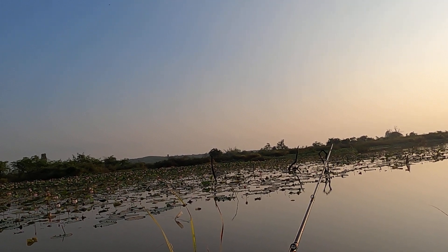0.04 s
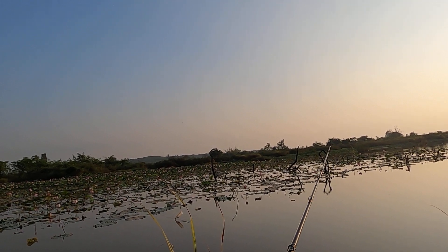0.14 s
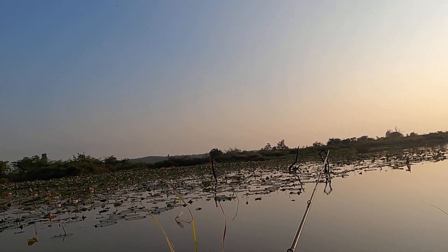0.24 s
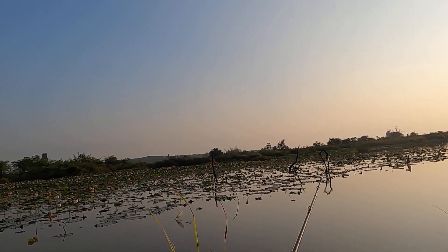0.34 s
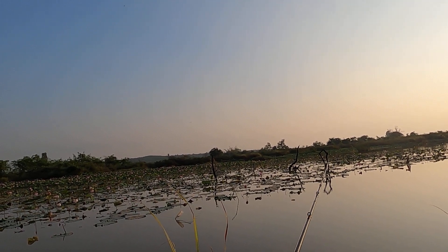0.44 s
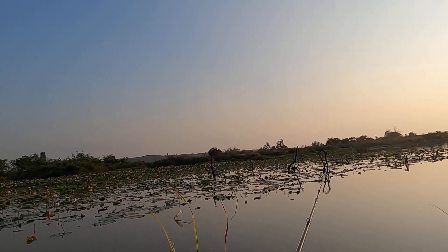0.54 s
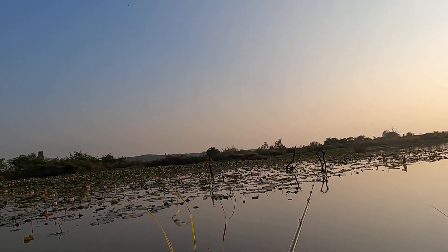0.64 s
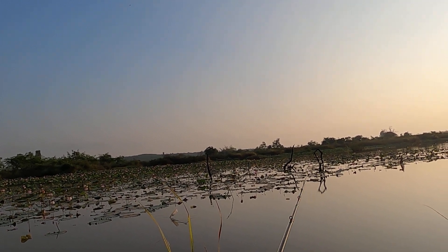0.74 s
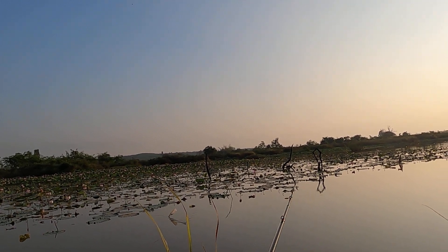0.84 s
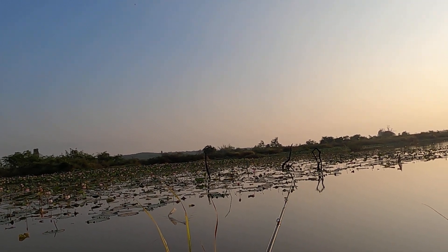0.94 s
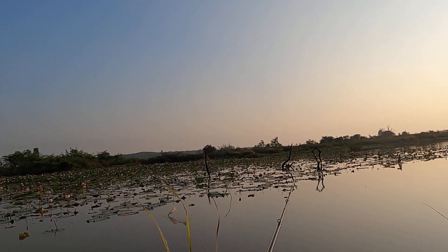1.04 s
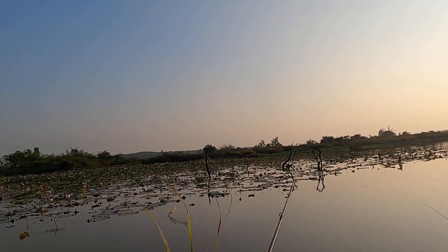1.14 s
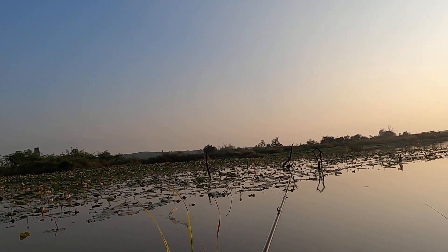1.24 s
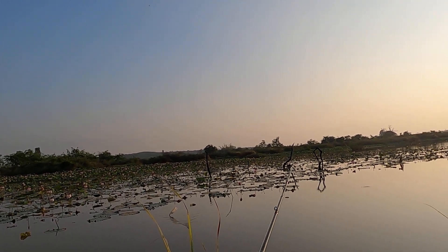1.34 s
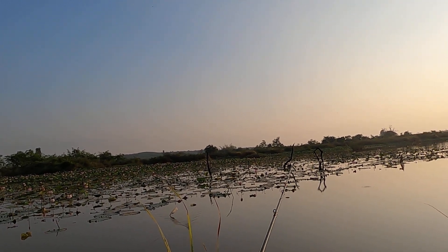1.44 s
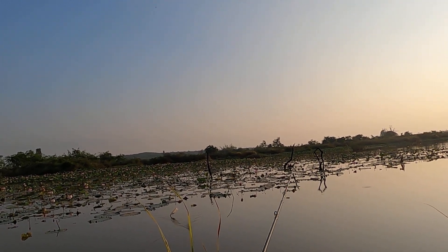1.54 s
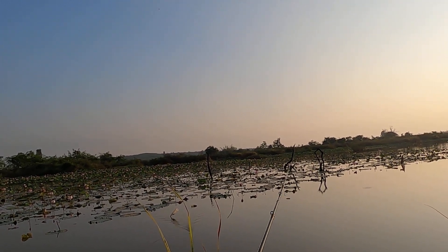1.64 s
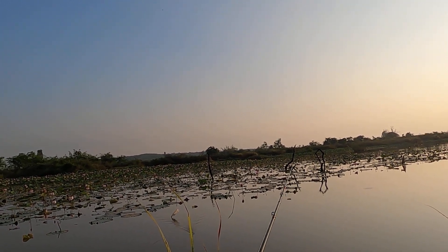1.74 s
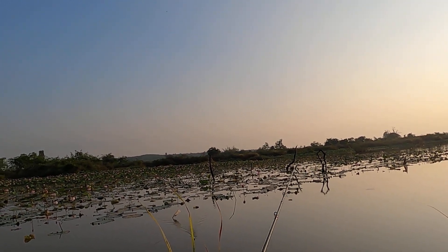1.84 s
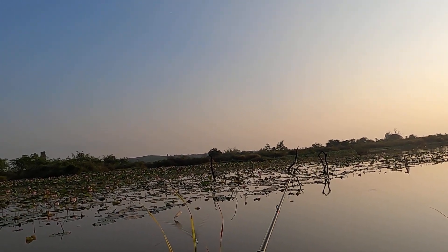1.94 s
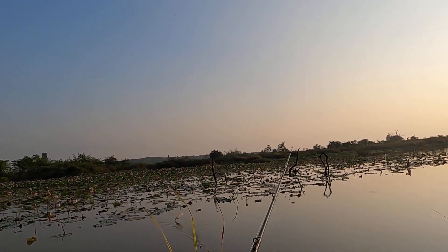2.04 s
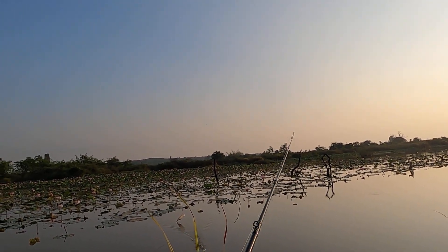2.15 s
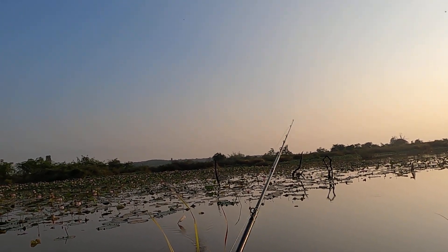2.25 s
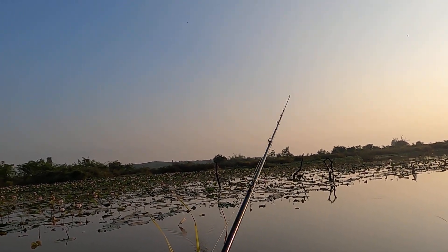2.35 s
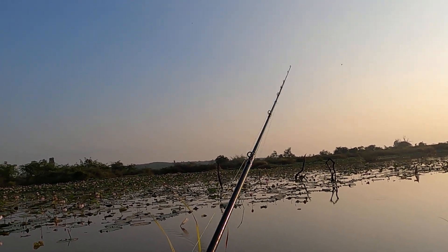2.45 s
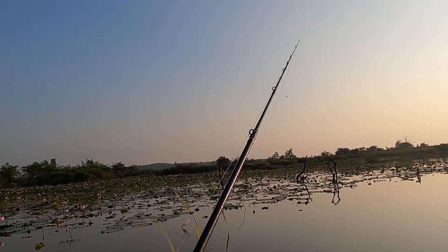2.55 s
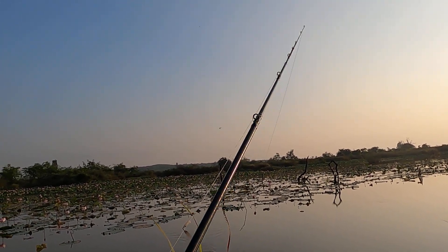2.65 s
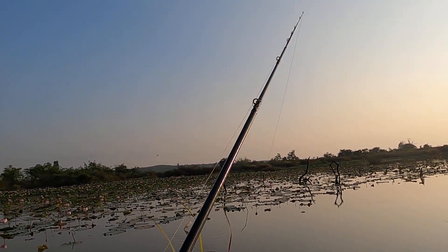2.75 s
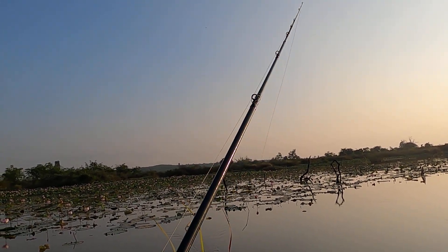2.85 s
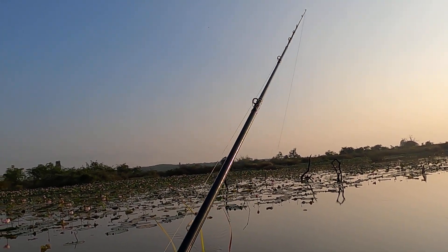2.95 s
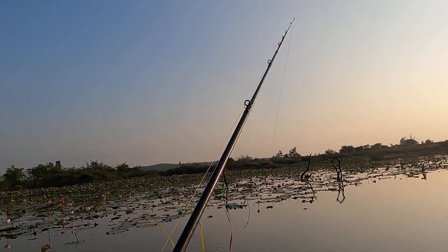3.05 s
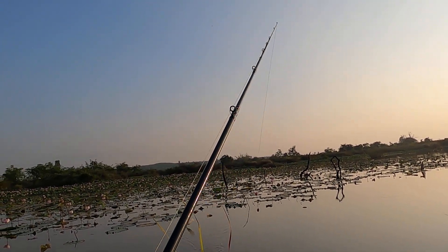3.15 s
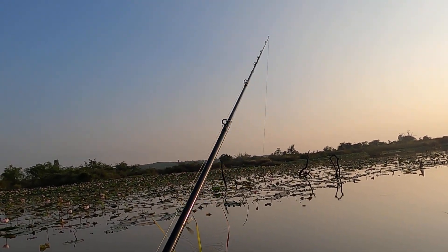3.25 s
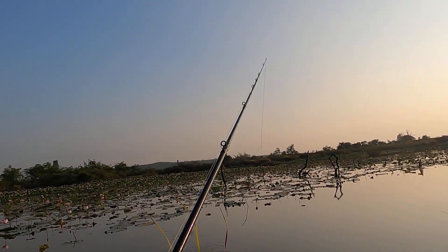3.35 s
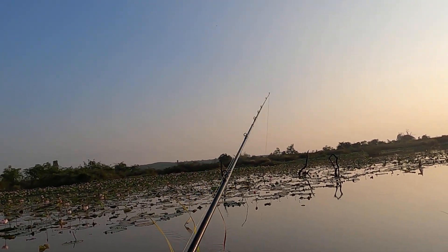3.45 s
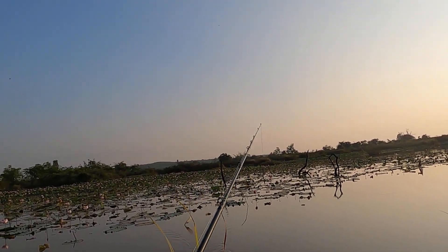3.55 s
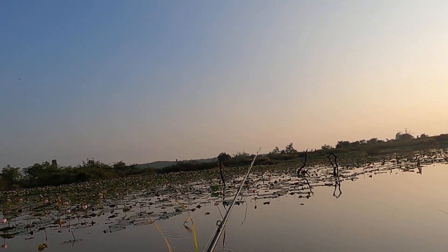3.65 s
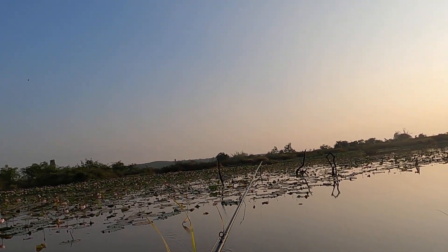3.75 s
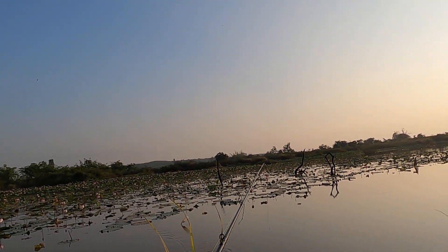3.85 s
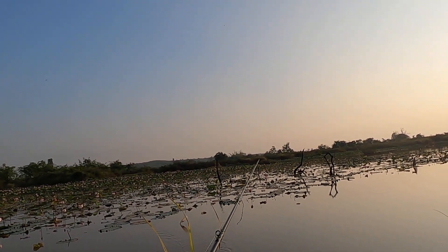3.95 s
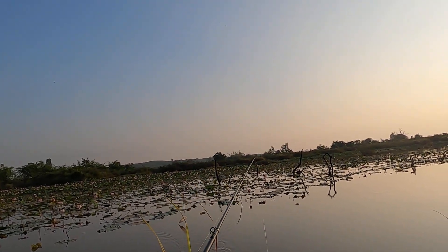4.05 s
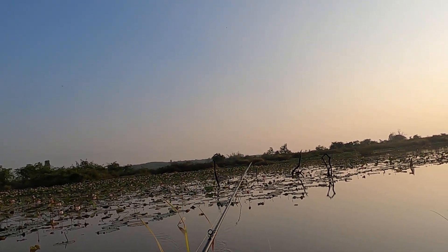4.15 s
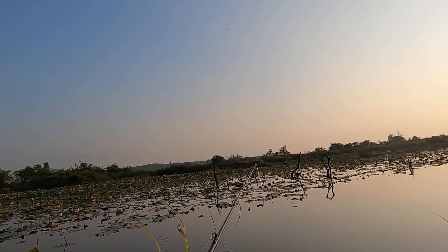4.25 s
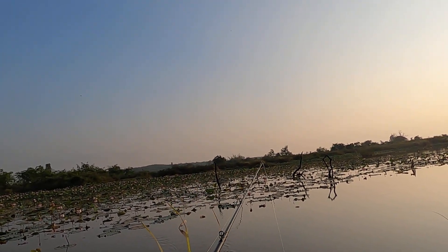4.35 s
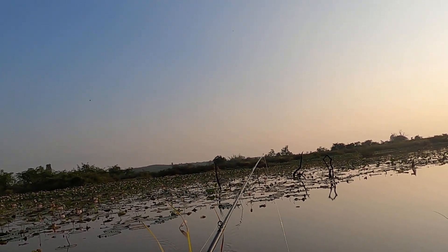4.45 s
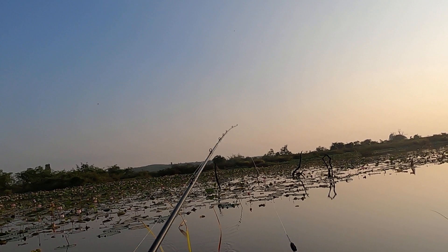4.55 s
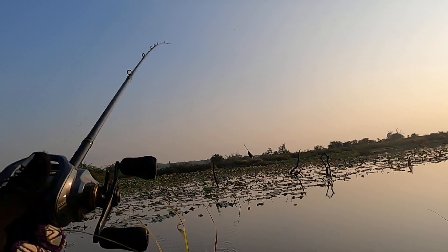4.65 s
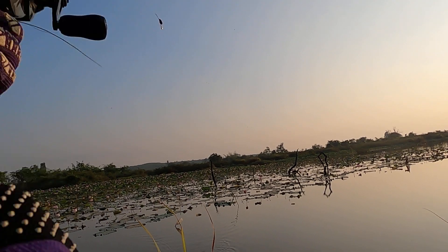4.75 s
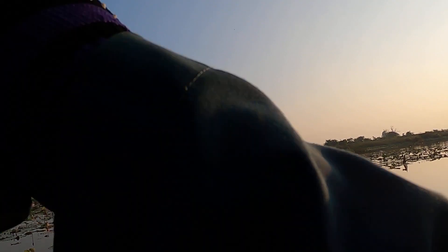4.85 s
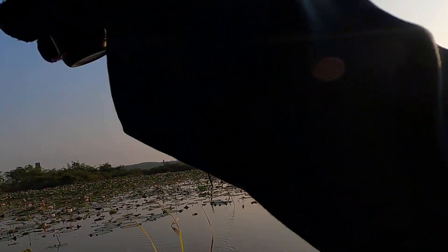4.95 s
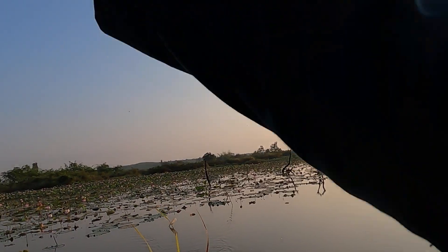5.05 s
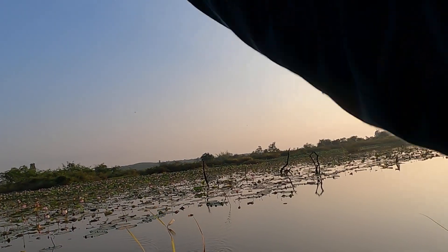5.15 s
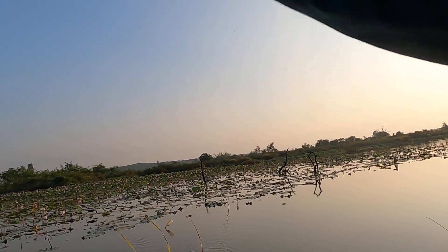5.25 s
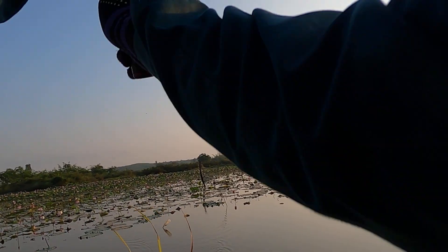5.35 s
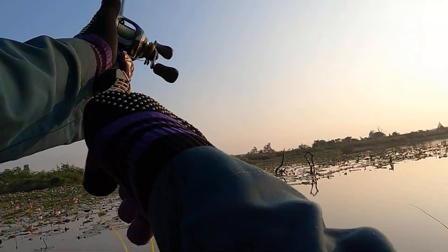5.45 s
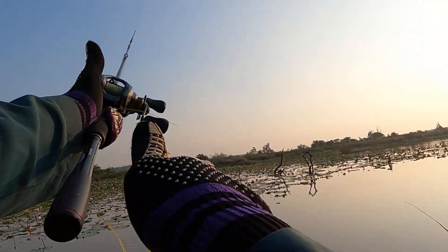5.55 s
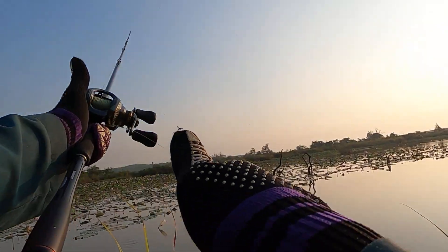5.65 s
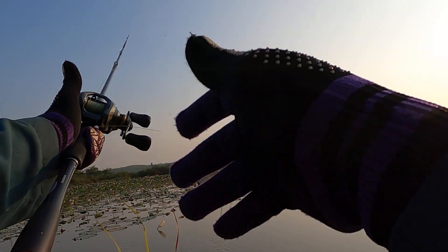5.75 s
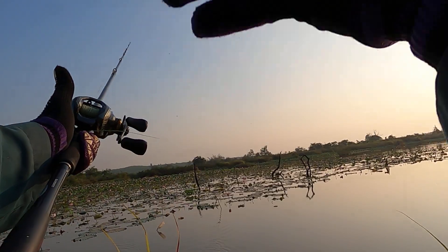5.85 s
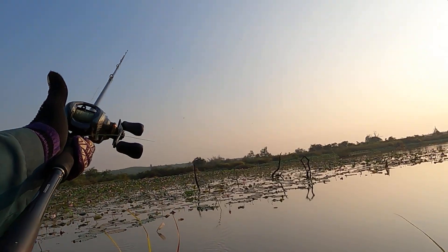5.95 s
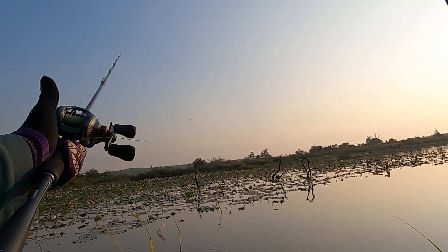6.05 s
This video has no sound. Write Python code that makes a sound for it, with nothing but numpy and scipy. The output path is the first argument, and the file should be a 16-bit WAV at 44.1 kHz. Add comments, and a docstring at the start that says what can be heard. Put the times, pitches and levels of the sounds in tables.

```python
"""On a still lily lake an angler winds in line, presses the clutch of his reel, swings the rod and casts.
Reel sounds are noise grains and short blows ringing resonances; the swing is gusting shaped noise.
The spool whirs as a gliding sine while its electronic brake sings in sums and differences of two tones.
Katydids trill and a cricket buzzes as pulsed sines, and a small bird repeats a phrase of swept sines.
Everything is heard at two ports a finger apart, through small delays and level differences."""
import sys
import numpy as np
from scipy import signal
from scipy.fft import rfft, irfft, next_fast_len
from scipy.io import wavfile
from scipy.ndimage import uniform_filter1d, map_coordinates

SR = 44100
rng = np.random.default_rng(int(sys.argv[2]) if len(sys.argv) > 2 else 0)


def wav_record(signal):
    """Record a signal, one row per channel, as 16-bit PCM in the file named by sys.argv[1]."""
    frames = np.transpose(np.atleast_2d(signal))
    bounded = np.clip(frames, -1, 1)
    # unit amplitude maps onto the largest positive 16-bit level
    quanta = np.round(bounded * 32767).astype(np.int16)
    wavfile.write(sys.argv[1], SR, quanta)


N = 268807
T = np.arange(N) / SR  # time in s

# Likeness of the two ports in broad noise. Each row: frequency in Hz, left-right correlation (0 to 1).
PORT_LIKENESS = [(60, 0.99), (600, 0.38), (1500, 0.54), (3000, 0.12), (6000, 0.44), (15000, 0.38)]


def amp(db):
    """Decibels are twenty times the decimal logarithm of an amplitude ratio."""
    return 10 ** (np.asarray(db) / 20)


def unit(x):
    """Normalization to unit root-mean-square amplitude."""
    return x / np.sqrt(np.mean(x ** 2) + 1e-20)


def along(points, hz):
    """Linear interpolation of (Hz, value) points on a logarithmic frequency axis."""
    f, v = np.transpose(points)
    return np.interp(np.log(hz + 1), np.log(f + 1), v)


def curves(rows):
    """Envelopes by interpolation in time: -120 before the first row, the last value held after it."""
    s, *cols = np.transpose(rows)
    return [np.interp(T, s, c, left=-120, right=c[-1]) for c in cols]


def wobble(rate):
    """Band-limited random modulation: a smooth curve through Gaussian knots, rate knots a second."""
    return map_coordinates(rng.standard_normal(int(N * rate / SR) + 4), [T * rate])


def filtered(x, response):
    """Linear filtering: the spectrum times a complex response of frequency."""
    m = next_fast_len(N + 8192)
    return irfft(rfft(x, m) * response(np.fft.rfftfreq(m, 1 / SR)), m)[..., :N]


def body(modes):
    """Modal response: a sum of damped resonances (centre Hz, width Hz, dB) of alternating sign."""
    def response(f):
        return sum((-1) ** k * amp(db) * 1j * f * w / (c * c - f * f + 1j * f * w)
                   for k, (c, w, db) in enumerate(modes))
    return response


def place(x, lead_us, pan_db):
    """Interaural-style cues: positive lead and pan make the left port earlier and louder."""
    side = np.array([[.5], [-.5]])
    return filtered(x, lambda f: amp(side * pan_db) * np.exp(2j * np.pi * f * side * lead_us * 1e-6))


def rush(spectrum, alike, lead_us=50, patchy_db=2.0):
    """Diffuse turbulence: unit-rms stereo noise with random gain patches and set coherence by frequency."""
    z = signal.stft(rng.standard_normal((2, N)), nperseg=256)[2]
    field = uniform_filter1d(rng.standard_normal(z.shape[1:]), 4, 0)
    field = uniform_filter1d(field, 5, 1)
    pair = signal.istft(z * amp(patchy_db * unit(field)), nperseg=256)[1][:, :N]

    def mix(hz):
        # cos(2 * turn) is the correlation of mid + side with mid - side
        turn = np.arccos(np.clip(along(alike, hz), -1, 1)) / 2
        return amp(along(spectrum, hz)) * [np.cos(turn), np.sin(turn)]
    mid, side = filtered(pair, mix)
    return unit(place(np.array([mid + side, mid - side]), lead_us, -1.1))


def add(track, s, piece):
    """Superposition: mix a piece into the track at s seconds."""
    i = round(s * SR)
    piece = piece[..., max(-i, 0):N - i]
    track[..., max(i, 0):max(i, 0) + piece.shape[-1]] += piece


def winding():
    """Friction excitation: uneven gear grains ring the reel's frame; the wet line hums and spits."""
    # Effort on the handle. Each row: time in s, mean gear level in dB.
    effort = [(0, -65.5), (.55, -65.5), (.78, -54), (.9, -61.5), (1.17, -54.5), (1.28, -58.5), (1.6, -52.5),
              (2.2, -48), (2.9, -47), (3.55, -49), (4.0, -52), (4.15, -66), (4.34, -62), (4.42, -47),
              (4.53, -60), (4.6, -49), (4.76, -74), (5.1, -55)]
    # Frame resonances. Each row: centre in Hz, width in Hz, level in dB.
    gear_modes = [(1397, 240, -14.5), (1686, 88, 0), (1919, 65, -5), (2056, 101, -3), (3030, 610, -15)]
    # Handle knob. Each row: time in s, mean level over the gear in dB.
    knob_over_gear = [(0, -4.5), (1.0, -4.5), (2.2, -4), (2.7, -5), (2.9, -11.5), (3.6, -5.5), (4.0, -6.5),
                      (4.2, -10), (5.1, -37)]
    # Hum of the line. Each row: time in s, level in dB.
    line_hum = [(0, -72), (.55, -65.5), (.9, -61), (1.15, -61.5), (1.8, -63.5), (2.15, -53.5),
                (2.55, -54.5), (2.89, -62), (2.98, -44.5), (3.45, -57.5), (4.0, -71), (4.2, -83),
                (4.45, -58.5), (4.75, -75), (4.86, -54.5), (5.1, -57)]
    stroke_s, first_stroke_s = .2, .375  # each push of the handle, two a turn
    gear_surge_db, knob_surge_db = 1, 2  # swell at each push
    catch_s, catch_half_s, catch_db = 2.438, 0.027, 11  # the handle catches for a moment
    grain_top_hz = 7000  # the rubbing teeth are too blunt to excite more

    stop = [(5.15, -120)]
    effort_db, = curves(effort + stop)
    over_db, = curves(knob_over_gear + stop)
    hum_db, = curves(line_hum + stop)
    push = np.cos(2 * np.pi * (T - first_stroke_s) / stroke_s)
    dip_db = catch_db * np.clip(1 - np.abs(T - catch_s) / catch_half_s, 0, 1)
    gear_db = effort_db + gear_surge_db * push - dip_db
    knob_db = effort_db + over_db + knob_surge_db * push - dip_db

    grains = rng.standard_normal((2, N)) * amp(2.3 * wobble(200) + 1.2 * wobble(50))
    rubbing = grains[0] + 0.25 * grains  # mostly common to both ports
    grip = np.clip(.5 + 1.0 * wobble(6), 0, 1)

    def ring(modes):
        """Drifting resonance: the grip crossfades two slightly detuned sets of modes."""
        def tuned(shift):
            return filtered(rubbing, lambda f: body(modes)(f * shift) / (1 + 1j * f / grain_top_hz) ** 2)
        return unit(grip * tuned(.96) + (1 - grip) * tuned(1.04))

    gear = amp(gear_db) * ring(gear_modes)
    knob = amp(knob_db) * ring([(863, 147, 0)])
    line = rng.standard_normal((3, N)) * amp(2.6 * wobble(24.58))
    hum = unit(filtered(line[0] + 0.41 * line[1:], lambda f: body([(360, 220, 0)])(f) ** 2))
    spray_spectrum = [(3000, -35), (4000, -2), (5500, -3), (7000, -7), (9000, -46)]  # (Hz, dB)
    spray = amp(1.5 * wobble(60)) * rush(spray_spectrum, PORT_LIKENESS, patchy_db=4.5)
    return place(gear + knob, 61, -4) + amp(hum_db - dip_db) * hum + amp(0.52 * gear_db - 39) * spray


def air():
    """Structure-borne rumble and bumps through the mount, over the broadband still air of the lake."""
    # Relative rumble spectrum. Each row: frequency in Hz, spectral level in dB.
    rumble_spectrum = [(11, -62), (18, -9), (48, 7), (118, -5.5), (152, 0), (216, -6.5), (300, -13),
                       (390, -43.5), (660, -120)]
    # Relative spectrum of the still air. Each row: frequency in Hz, spectral level in dB.
    air_spectrum = [(59, -24), (100, 1), (219, 1), (413, -16), (731, -17), (1020, -10), (1160, -13.5),
                    (1630, -9.5), (2710, -18.5), (3150, -15), (4140, -28), (6880, -25), (8870, -9.5),
                    (11900, -33), (15700, -37)]
    # Knocks against the mount. Each row: peak time in s, mean level in dB.
    mount_bumps = [(.06, -65), (.39, -62), (.75, -47.5), (1.18, -54), (2.24, -63), (3.13, -65), (3.38, -58),
                   (3.5, -64), (3.65, -60), (3.86, -62), (4.85, -41)]
    rumble_db, rise_s, fall_s = -58.5, 0.042, 0.05  # mean steady rumble; time constants of a bump

    bumps = 0
    for s, db in mount_bumps:
        bumps = bumps + amp(db) * np.exp(-np.where(T < s, (s - T) / rise_s, (T - s) / fall_s))
    fade = np.clip((5.2 - T) / 0.26, 0, 1)  # the steady part is gone at 5.2 s
    steady = amp(rumble_db + 2.4 * wobble(5.45)) * fade
    rumble = (steady + bumps) * amp(3.2 * wobble(22)) * rush(rumble_spectrum, [(30, 0.99), (200, 0.85)])
    return rumble + amp(-54.5 + wobble(1.76)) * rush(air_spectrum, PORT_LIKENESS)


def stridulate(rate, hz, glide, width):
    """Stridulation: periodic wing strokes, each a short scrape whose pitch slides."""
    cycle = np.cumsum(rate * (1 + .01 * wobble(3.3))) / SR % 1
    stroke = np.exp(-((cycle - .5) / width) ** 2)
    pitch = hz * (1 + glide * (.5 - cycle) + 0.015 * wobble(900))
    tone = np.sin(2 * np.pi * np.cumsum(pitch) / SR)
    return unit(stroke * tone * amp(0.69 * wobble(300)))


def insects():
    """Amplitude-modulated trills of two katydids, a chorus fizz, cricket buzzes and a far thin note."""
    # Katydids and chorus together. Each row: time in s, level in dB.
    katydid_levels = [(0.0, -51.5), (.87, -59), (2.9, -57), (3.82, -55.5), (4.55, -55), (5.03, -68),
                      (5.67, -61), (6.0, -55), (6.1, -51)]
    # Cricket buzzes, swelling to a sudden stop. Each row: end in s, level in dB.
    buzzes = [(.145, -58.5), (.54, -58.5), (.87, -58.5), (1.241, -57.5), (1.615, -56.5), (2.075, -58),
              (2.41, -57.5), (2.83, -59), (3.31, -57.5), (3.665, -56), (4.15, -58.5), (4.58, -57),
              (4.95, -63)]
    # A far insect's thin note. Each row: start in s, end in s, level in dB.
    drones = [(-.1, 0.146, -70), (1.24, 1.45, -71)]

    level_db, = curves(katydid_levels)
    pause = np.clip(np.cos(2 * np.pi * (T - .69) / .1216), 0, 1) ** 1.5  # about eight a second
    steady = amp(-4 * pause) * stridulate(121, 8600, .1, width=.2)
    pausing = amp(-18 * pause) * stridulate(130, 9150, .08, width=.2)
    pair = place(steady, 59.4, -1) + amp(-2.5) * place(pausing, 55.7, -8.5)
    chorus_spectrum = [(7000, -42), (7800, 0.5), (8800, 13.5), (9700, -44),
                       (10800, -3.0), (11600, -30), (12500, -120)]  # (Hz, dB)
    chorus = amp(-3.5) * rush(chorus_spectrum, [(9000, 0.1)])

    swell = 0
    for end, db in buzzes:
        # rises for 60 ms at 560 dB/s, then holds for 30 ms
        rise = amp(db - 560 * np.clip(end - .03 - T, 0, 1))
        swell = swell + rise * (T < end) * (T > end - .09)
    buzz = swell * stridulate(222, 7100, .3, width=.42)

    held = sum(amp(db) * np.clip(np.minimum(T - a, b - T) / 0.027, 0, 1) for a, b, db in drones)
    note_spectrum = [(6500, -120), (6850, -13), (7050, -5), (7250, -22), (7600, -120)]
    note = held * rush(note_spectrum, [(7000, 0.59)], lead_us=110)
    return amp(level_db) * (pair + chorus) + place(buzz, 32.7, -1.1) + note


def whistle(hz, db):
    """Frequency modulation: a soft-edged sine whose phase integrates a pitch track."""
    return amp(db) * np.hanning(len(hz)) ** .3 * np.sin(2 * np.pi * np.cumsum(hz) / SR)


def shore(x):
    """Diffuse reflection: the far reeds answer with decaying noise of unit energy, convolved with x."""
    t = np.arange(SR // 6) / SR
    tail = rng.standard_normal((2, len(t))) * amp(-60 * t / 0.23)
    return signal.fftconvolve(x[None], tail / np.linalg.norm(tail[0]), axes=1)[:, :N]


def birds():
    """Swept tones: one singer repeats a fall and an arch, growing louder; others twitter."""
    # The singer's phrases: time of each arch's top in seconds.
    arch_tops = [.303, .692, 1.06, 1.45, 1.817, 2.19, 2.705, 3.1, 3.493, 3.873, 4.38, 4.79]
    # Other birds. Each row: start in s, first pitch in Hz, last pitch in Hz, length in s, level in dB.
    twitters = [(.03, 3300, 4300, .015, -59), (.045, 4300, 3300, .015, -59), (.41, 6200, 7400, .02, -60),
                (.916, 4870, 4700, .015, -58), (2.494, 5950, 4500, .015, -55),
                (3.46, 3870, 5000, .015, -58), (3.497, 3740, 4600, .012, -58),
                (3.868, 3580, 4400, .012, -60), (4.022, 3080, 4300, .015, -56),
                (4.097, 3340, 4300, .018, -55), (4.545, 3720, 5400, .022, -56),
                (4.631, 3780, 6000, .012, -55), (4.672, 3620, 4900, .02, -58),
                (4.705, 4440, 4620, .027, -59), (4.732, 4500, 2800, .011, -62)]
    fall_db, fall_fade_db, arch_db = -51, 12, -59  # levels at time zero; the fall fades as it drops
    growth_db_per_s = .8
    far_count, far_db = 5, -64  # faint twitters at random

    singer, others = np.zeros(N), np.zeros(N)
    u = np.linspace(-.85, .85, round(.072 * SR))
    v = np.linspace(0, 1, round(0.021 * SR))
    arch_hz = 2700 + 860 * np.exp(-2.4 * u ** 2)
    fall_hz = 6200 - 3500 * v ** 1.6
    for s in arch_tops:
        growth_db = growth_db_per_s * s
        add(singer, s - .036, whistle(arch_hz, arch_db + growth_db))
        add(singer, s - .155, whistle(fall_hz, fall_db + growth_db - fall_fade_db * v))
    far = [(4.8 * a, 3200 + 1500 * b, 3500 + 1500 * c, .014, far_db)
           for a, b, c in rng.random((far_count, 3))]
    for s, from_hz, to_hz, length, db in twitters + far:
        add(others, s, whistle(np.linspace(from_hz, to_hz, round(length * SR)), db))
    return place(singer, -80, 5) + place(others, 40, -2) + amp(-11) * shore(singer + others)


def clicks():
    """Impact excitation: short blows ring the housing's modes, loose parts rattle on, bright ticks sit on top."""
    # Clutch, bail and grip. Each row: start in s, knock drive in dB, tick drive in dB, left over right
    # in dB, centre in Hz, 60 dB decay time in s (held to 0.002 or more below).
    contact_rows = [(4.378, -23, -40, -2.0, 1730, 0.023), (4.385, -16.5, -18.5, 13.5, 1910, 0.0089),
                    (4.389, -12, -24, -11, 1750, 0.014), (4.396, -20, -36, 0, 1730, 0.017),
                    (4.593, -26, -26, 0, 1840, 0.0094), (4.835, -38, -41, -12, 1540, 0.01),
                    (4.878, -20, -50, -16, 1450, 0.0044), (4.881, 2.8, -6, 6, 2500, 0.0098),
                    (4.976, -6.5, -28, -6.5, 2360, 0.0053), (5.073, -29, -47, -7, 1620, 0.011),
                    (5.26, -31, -55, -16, 1470, 0.011), (5.435, -14, -34, -13.5, 2170, 0.0019),
                    (5.465, -16.5, -27, -5.5, 1430, 0.02), (5.609, -11, -24, -3, 880, 0.014)]
    # Housing resonances. Each row: centre in Hz, width in Hz, level in dB.
    housing_modes = [(573, 400, -8), (1006, 144, 0.5), (1595, 330, 0.5), (2210, 360, -5), (3176, 340, 0),
                     (4520, 730, -10.5)]
    # Play in the handle. Each row: start in s, knock drive in dB.
    handle_knocks = [(1.169, -36), (1.971, -34), (2.2, -23), (2.453, -20), (2.599, -26), (3.04, -26.5)]
    # Bright ticks without body. Each row: start in s, tick drive in dB, left over right in dB.
    line_ticks = [(2.453, -32, -2.5), (2.906, -18.5, -5), (3.039, -23, 2), (3.66, -24, 2),
                  (5.323, -18, -7.5)]
    handle_hz, handle_t60_s, handle_pan_db, tick_t60_s = 1580, 0.0098, -3, 0.0096

    contacts = list(contact_rows)
    contacts += [(s, db, -120, handle_pan_db, handle_hz, handle_t60_s) for s, db in handle_knocks]
    contacts += [(s, -120, db, pan, handle_hz, tick_t60_s) for s, db, pan in line_ticks]
    knock, tick = np.zeros((2, N)), np.zeros((2, N))
    t = np.arange(SR // 16) / SR
    rattle = amp(-23 - 60 * t / 0.067)
    blows = rng.standard_normal((len(contacts), 2, len(t)))
    for (s, knock_db, tick_db, pan, hz, t60), blow in zip(contacts, blows):
        fall = amp(-60 * t / np.clip(t60, .002, .06)) * (1 - np.exp(-t / .0004))
        ports = amp([[pan / 2], [-pan / 2]])
        strike = (fall + rattle) * blow[0] + 4 * (t == 0)  # noise with an impulse at its head
        contact = signal.lfilter(*signal.iirpeak(hz, 1.1, SR), strike)
        add(knock, s, amp(knock_db) * ports * contact / np.abs(contact).max())
        add(tick, s, amp(tick_db) * ports * fall * blow[1])

    def bright(f):
        modes = body([(5800, 2500, 0), (8000, 1600, 2), (14000, 2500, -32)])
        return modes(f) * f ** 2 / (f ** 2 + 3500 ** 2)
    return place(filtered(knock, body(housing_modes)) + filtered(tick, bright), 51.0, 0)


def swing():
    """Aerodynamic noise: the rod tears the air in gusts, sleeves flap, wind is stronger at the right port."""
    # Course of the swing. Each row: time in s, swish level in dB, treble level in dB, wind level in dB.
    swing_levels = [(4.78, -86, -63, -83), (4.9, -63, -56.5, -68), (5.1, -56, -55.5, -49.5),
                    (5.39, -50, -52.5, -39.5), (5.5, -39.5, -46, -32), (5.53, -31, -44, -30),
                    (5.556, -27.5, -33.5, -25), (5.605, -30, -37, -30.5), (5.66, -44, -45, -45),
                    (5.7, -42.5, -45, -34), (5.73, -41.5, -43, -48), (5.77, -47.5, -49, -46.5),
                    (5.9, -48, -49.5, -54), (6.1, -58.5, -55, -58)]
    # Relative spectra. Each row: frequency in Hz, spectral level in dB.
    swish_spectrum = [(150, -33), (250, -22), (368, -6.5), (454, -13), (1470, -14), (1680, -12),
                      (2500, -19), (3250, -58), (5500, -120)]
    hiss_spectrum = [(2650, -39), (4500, -5.5), (5660, -3.5), (7750, -8), (8740, -6), (15700, -32)]
    hiss_under_db = 3  # below the treble level
    flap_at_db, flap_growth = -43, 0.7  # flap level at a wind of -39.5 dB; dB per dB of wind

    swish_db, treble_db, wind_db = curves(swing_levels)
    flap_db = flap_at_db + flap_growth * (wind_db + 39.5)
    gust_db = 1.15 * wobble(70) + 0.94 * wobble(400)
    swish = amp(swish_db + gust_db) * rush(swish_spectrum, PORT_LIKENESS, patchy_db=2.0)
    tip_spectrum = [(1500, -24), (2400, -2.5), (3500, -3.5), (4600, -5), (6000, -39)]
    tip = amp(treble_db + gust_db) * rush(tip_spectrum, PORT_LIKENESS, patchy_db=0.5)
    hiss = amp(treble_db - hiss_under_db + gust_db) * rush(hiss_spectrum, PORT_LIKENESS, patchy_db=2.0)
    flap_spectrum = [(90, -30), (150, -3), (330, -8), (500, -14), (900, -120)]
    flap = amp(flap_db) * rush(flap_spectrum, [(100, 0.65)])
    wind_spectrum = [(10, -29), (25, 1.0), (55, -3.5), (110, -6), (170, -16.5), (400, -120)]
    wind = amp(wind_db + [[-1.5], [1.5]]) * rush(wind_spectrum, [(50, 0.48)])
    return swish + tip + hiss + flap + wind


def spool():
    """Ring modulation: four magnet poles a turn pass a chopped coil, mirroring their tone about its harmonics."""
    # Once-a-turn hum. Each row: time in s, mean level in dB.
    hum_levels = [(5.56, -80), (5.6, -37), (5.68, -38.5), (5.74, -53), (5.92, -43), (6.03, -65.5),
                  (6.1, -69)]
    # The free spool. Each row: time in s, mean speed in turns per second.
    spool_turns = [(5.56, 385), (5.62, 397), (5.68, 397), (5.72, 381.5), (5.8, 352), (6.0, 283.5),
                   (6.04, 270.3), (6.1, 258)]
    # Two stages of the brake. Each row: multiple of the chop rate, then relative levels in dB of the
    # chop tone, of the tone plus the pole rate and of the tone minus the pole rate.
    first_stage = [(0, -60, -8, -60), (1, -7, 0, -60), (2, -1, -6, -25), (3, -9, -16, -14),
                   (4, -20, -24, -14), (5, -14, -28, -22), (6, -32, -30, -25), (7, -25, -30, -30),
                   (8, -19, -30, -32), (9, -15, -32, -32), (10, -21, -36, -36), (11, -22, -40, -36),
                   (12, -36, -42, -36), (13, -38, -50, -42), (14, -39, -50, -42), (15, -39, -50, -50)]
    second_stage = [(1, -7, -6, -27), (2, -12, -2.5, -5), (3, -12, -14, -24), (4, -16, -27, -8),
                    (6, -17, -26, -24), (7, -18, -28, -26)]
    # Uneven radiation of the reel's side plate. Each row: frequency in Hz, gain in dB.
    shell_gain = [(900, 0.5), (1200, -5.5), (1500, 1), (2000, 0), (2500, 2.5), (3130, 7), (3240, -9),
                  (3350, 2), (3480, -2), (3550, 6), (4200, 6), (5000, 6.5), (16000, 1.5)]
    first_hz, second_hz, stage_s = 974.9, 1299, 6.03  # chop rates and the moment of the switch
    brake_db, brake_top_s, sag_db_per_s, attack_s = -41, 5.8, 28, 0.039
    chop_growth_db_per_s = 10  # the steady chop tones gain on the gliding ones as the brake bites
    start_s = hum_levels[0][0]

    turns, = curves(spool_turns)
    hum_db, = curves(hum_levels)
    attack = np.clip((T - start_s) / attack_s, 0, 1) ** 2
    brake = amp(brake_db - sag_db_per_s * np.abs(T - brake_top_s)) * attack
    angle = 2 * np.pi * np.cumsum(turns * (1 + 0.0012 * wobble(40))) / SR
    span = T > start_s
    angle, t, brake = angle[span], T[span], brake[span]
    switch = np.clip((t - stage_s) / 0.0065 + .5, 0, 1)
    hum = amp(hum_db[span] + 3.4 * wobble(36)[span]) * np.sin(angle)
    sound = hum * np.ones((2, 1))
    side = np.array([[.5], [-.5]])
    for stage, hz, gate in ((first_stage, first_hz, 1 - switch), (second_stage, second_hz, switch)):
        for k, *levels in stage:
            for way, db in zip((0, 4, -4), levels):  # pole passages a turn, added or subtracted
                # 70 microseconds between the ports, at a typical 330 turns per second
                delay = side * 2 * np.pi * (k * hz + way * 330) * 7e-5
                phase = rng.uniform(0, 2 * np.pi) + delay
                flutter = np.interp(t, np.linspace(t[0], t[-1], 14), rng.normal(0, 1.6, 14))
                growth = (way == 0) * chop_growth_db_per_s * (t - brake_top_s)
                tone = np.sin(2 * np.pi * k * hz * t + way * angle + phase)
                sound += gate * brake * amp(db + flutter + growth) * tone
    out = np.zeros((2, N))
    out[:, span] = sound * amp([[-1], [1]])
    return filtered(out, lambda f: amp(along(shell_gain, f)))


def scene():
    """Superposition of all the sources at the two ports."""
    return winding() + air() + insects() + birds() + clicks() + swing() + spool()


def record(dry):
    """Band limitation: an ideal low-pass keeps nothing at or above its edge."""
    top_hz = 15780
    return filtered(dry, lambda hz: hz < top_hz)


dry = scene()
out = record(dry)
wav_record(out)
```